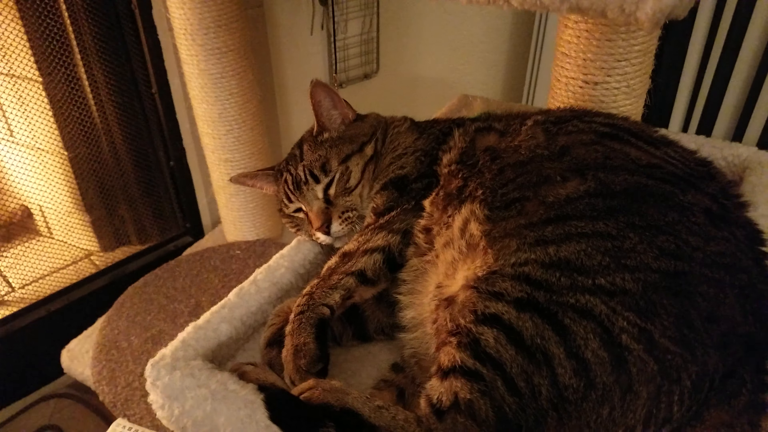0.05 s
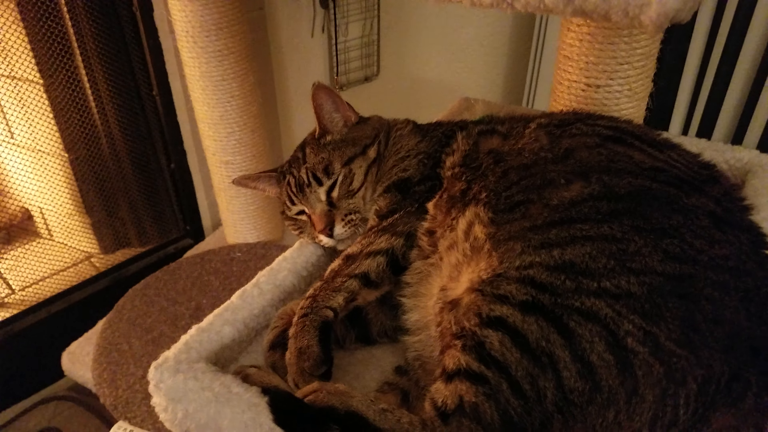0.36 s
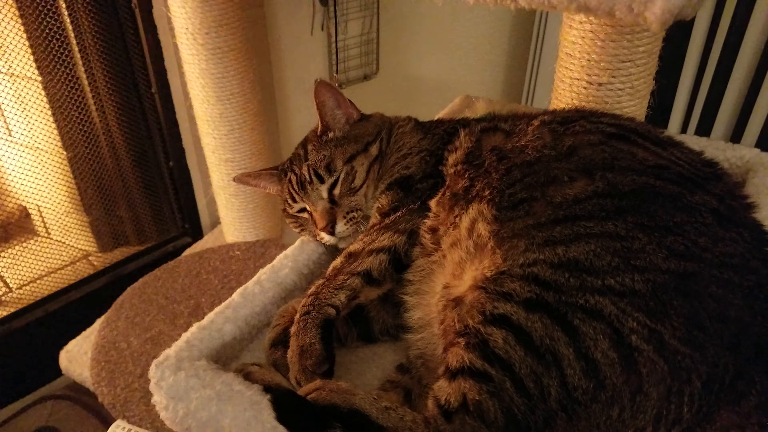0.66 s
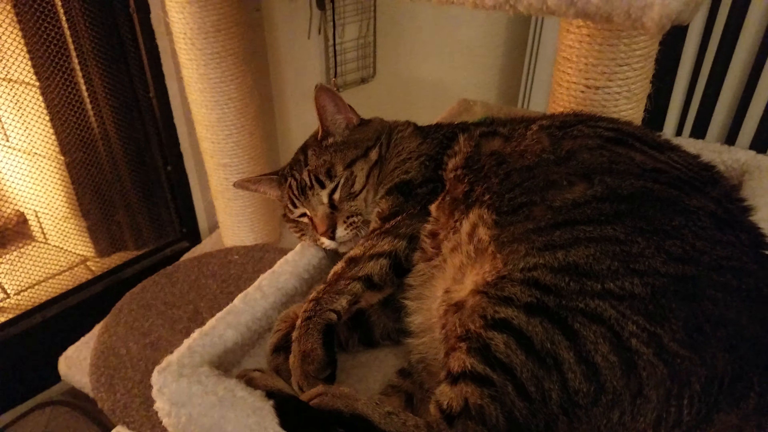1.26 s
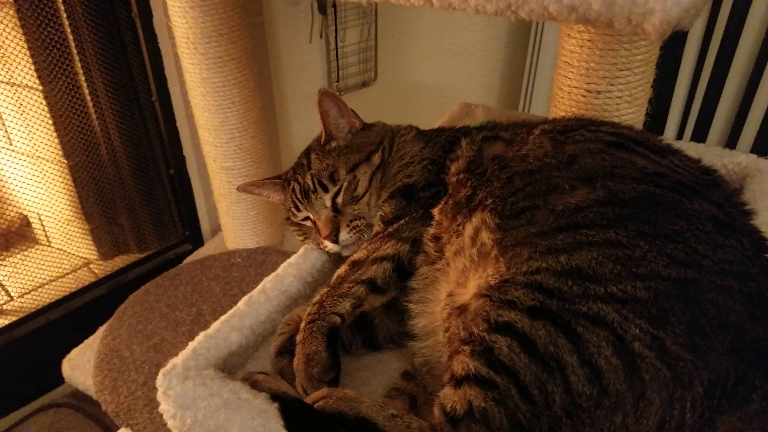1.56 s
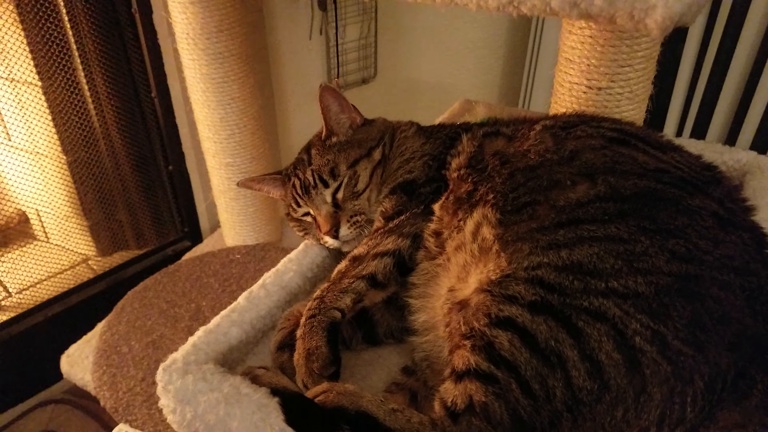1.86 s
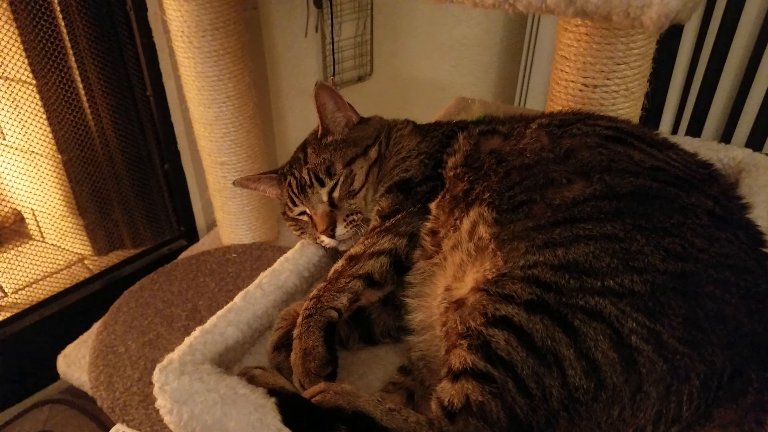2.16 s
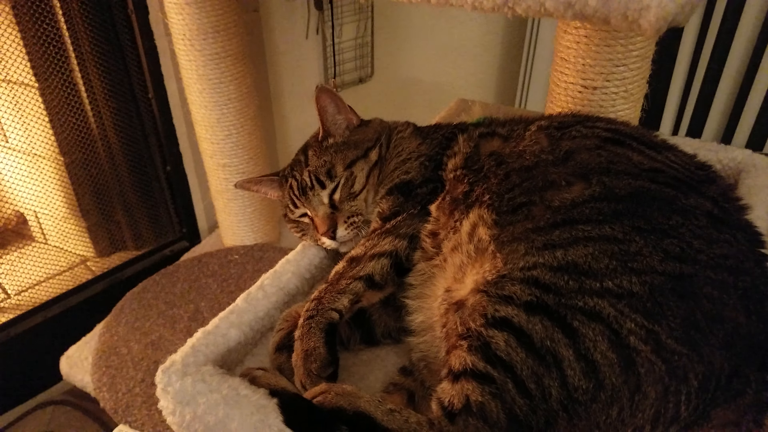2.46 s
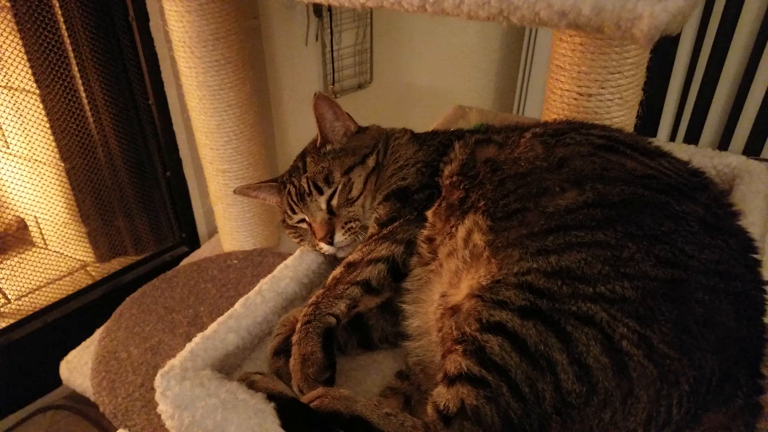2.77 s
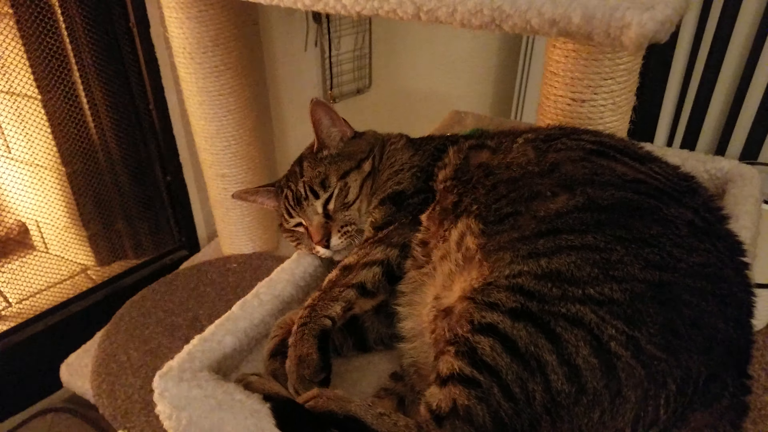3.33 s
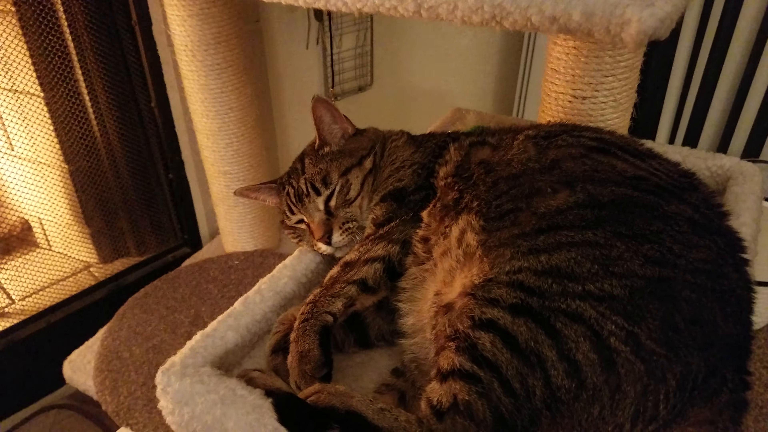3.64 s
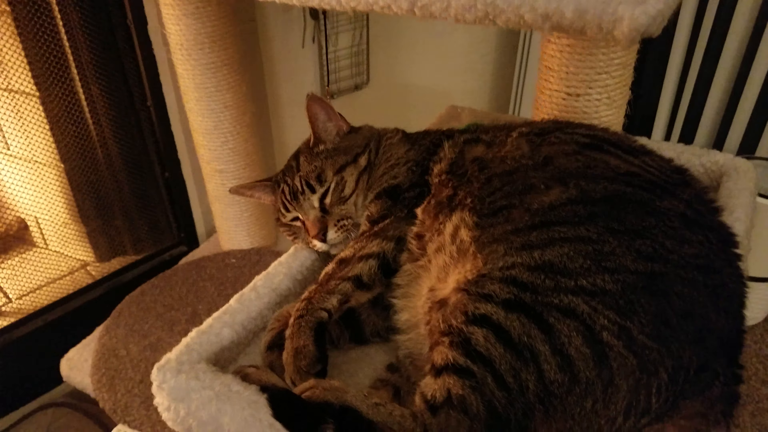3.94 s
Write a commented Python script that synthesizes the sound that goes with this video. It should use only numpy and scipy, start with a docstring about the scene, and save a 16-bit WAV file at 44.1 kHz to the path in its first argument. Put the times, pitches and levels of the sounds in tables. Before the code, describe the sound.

A gas fire burning with a low, soft rumble and small scattered pops.

```python
"""Gas fire in a quiet room

The fire burns behind its screen, a little to the left of a stereo microphone. A dense stream of tiny
puffs booms in the firebox and the room; now and then a flame pops or ticks, and twice the hot metal
clinks. A blower hums faintly underneath, and the microphone adds a thin hiss."""
import sys
import numpy as np
from scipy import signal
from scipy.fft import rfft, irfft
from scipy.io import wavfile

SR = 44100
rng = np.random.default_rng(int(sys.argv[2]) if len(sys.argv) > 2 else 0)


def store_wav(level_fs):
    """Save 16-bit WAV to argv[1]."""
    pcm = np.round(np.clip(np.atleast_2d(level_fs), -1, 1) * 32767)
    wavfile.write(sys.argv[1], SR, pcm.T.astype(np.int16))


N = 176400
T = np.arange(N) / SR
FFT_SIZE = 196608
HZ = np.maximum(np.arange(FFT_SIZE // 2 + 1) * SR / FFT_SIZE, 1)
SIDES = np.array([[1], [-1]])  # left, right
RIGHT_LAG_S = 0.00041


def undb(db):
    """Decibels to gain."""
    return 10 ** (np.asarray(db) / 20)


def level(x, db):
    """Scale to an rms level."""
    return x * undb(db) / np.sqrt(np.mean(x ** 2))


def over_hz(points):
    """Join (f/Hz, value) points on a log-frequency axis."""
    hz, value = np.array(points).T
    return np.interp(np.log(HZ), np.log(hz), value)


def shape(x, response):
    """Filter by a frequency response."""
    return irfft(rfft(x, FFT_SIZE) * response)[..., :N]


def causal(db):
    """The response with this dB curve that rings only after the blow (minimum phase)."""
    cepstrum = irfft(np.log(undb(db)))
    cepstrum[1:FFT_SIZE // 2] *= 2
    cepstrum[FFT_SIZE // 2 + 1:] = 0
    return np.exp(rfft(cepstrum))


def split(hz):
    """Low-pass and high-pass responses that cross at hz."""
    s = 1j * HZ / hz
    low = 1 / (s * s + np.sqrt(2) * s + 1)
    return low, low * s * s


def drift(per_s):
    """A random wander with a spread near 1."""
    return np.interp(T * per_s, np.arange(256), rng.standard_normal(256))


def firebox():
    """The ring of one puff in firebox and room, as a low and a high band."""
    # spectrum of a puff (f/Hz, level/dB)
    puff_colour = [(10, -46.5), (25, -9.5), (40, -6), (60, -1.5), (120, -7), (220, -10), (340, -9),
                   (500, -18), (640, -15.5), (1000, -13.5), (1250, -16.5), (1600, -17.5), (1950, -23.5),
                   (2400, -27.5), (2900, -33), (4400, -38), (6000, -47.5), (10000, -48), (20000, -83)]
    # resonances of firebox and room (f/Hz, width/Hz, lift/dB)
    resonances = [(51, 15, 3), (104.3, 14.8, 9.5), (143.6, 13, 6), (188.4, 16.6, 8.5), (254.4, 15.8, 6.5),
                  (286, 20, 0.5), (328, 6.9, 1), (371, 7.9, -0.5), (418, 33.5, 5.5), (602, 46, 4.5),
                  (745, 24, 7.5), (787.4, 37.4, 9.5), (928, 49, 4), (1694, 80, 1.5), (2128, 160, 6),
                  (2200, 82, -0.5), (2350, 100, 6), (4400, 260, 2)]
    lift_db = sum(db / (1 + (2 * (HZ - hz) / width) ** 2) for hz, width, db in resonances)
    ring = causal(over_hz(puff_colour) + lift_db)
    return [ring * band for band in split(hz=556)]


def room():
    """Two paths from fire to microphone: direct, arriving later on the right, and off the walls."""
    # power that comes by way of the walls (f/Hz, share/0-1)
    wall_share = [(50, 0), (150, 0.05), (300, 0.04), (450, 0.1), (620, 0.5), (790, 0.12), (1000, 0.47),
                  (1400, 0.22), (1900, 0.62), (2300, 0.22), (3000, 0.86), (8000, 0.65)]
    # stereo balance at the microphone (f/Hz, left minus right/dB)
    left_bias = [(50, 1), (200, -1.2), (400, 3), (550, -3), (850, 3.5), (1200, -0.5), (2300, 1.5),
                 (4000, 3.5)]
    share = over_hz(wall_share)
    balance = undb(SIDES * over_hz(left_bias) / 2)
    lag = np.exp(1j * np.pi * HZ * RIGHT_LAG_S * SIDES)
    return np.sqrt(1 - share) * lag * balance, np.sqrt(share) * balance


def puffs(spread_db, per_s=1500):
    """A random stream of pressure puffs of either sign, many small and a few large."""
    chance, size, sign = rng.random((3, N))
    hit, out = chance < per_s / SR, np.zeros(N)
    size_db = spread_db * np.minimum(-np.log(1 - size[hit]), 5)
    out[hit] = undb(size_db) * np.sign(sign[hit] - .5)
    return out


def flames(low, high, direct, walls):
    """Deep flutter, rumble and a lighter rush; the walls scatter each differently to the two sides."""
    # swell of the deep flutter (t/s, relative level/dB)
    flutter_swell = [(0.0, -60), (0.04, -50.5), (0.59, -54), (0.65, -57), (0.67, -52.5), (1.2, -55),
                     (1.75, -51), (1.78, -47.5), (2.15, -52.5), (2.26, -57), (2.31, -60), (2.35, -45.5),
                     (2.44, -68), (2.458, -51.5), (2.97, -60), (3.0, -52), (3.2, -52), (3.23, -49.5),
                     (4.0, -53.5)]
    # swell of the rumble above it (t/s, relative level/dB)
    rumble_swell = [(0.0, -56.5), (0.03, -52.5), (0.32, -54.5), (0.33, -49), (0.44, -54.5), (1.25, -52),
                    (1.56, -56), (1.57, -53.5), (2.13, -54), (2.19, -52.5), (2.23, -55.5), (2.26, -57),
                    (2.28, -52.5), (2.41, -52.5), (2.47, -54.5), (2.57, -53), (2.61, -56.5), (2.65, -53),
                    (3.77, -55), (4.0, -52)]

    def stream(band, swell, spread_db, rms_db, follow=1):
        """Puffs through one band of the firebox's ring, rising and falling with a swell."""
        when, swell_db = np.array(swell).T
        source = puffs(spread_db)
        scattered = source.std() * rng.standard_normal((2, N))
        sound = shape(source, band * direct) + shape(scattered, band * walls)
        return level(sound * undb(follow * np.interp(T, when, swell_db)), rms_db)
    deep, upper = split(hz=129)
    flutter = stream(low * deep, flutter_swell, spread_db=3.5, rms_db=-53.5)
    rumble = stream(low * upper, rumble_swell, spread_db=3.5, rms_db=-53.5)
    rush = stream(high, rumble_swell, spread_db=2.5, rms_db=-58.5, follow=0.33)
    return flutter + rumble + rush


def blower():
    """The fan hums faintly under the fire, its tones wavering slightly in pitch and level."""
    # fan tones at the microphone (f/Hz, left level/dB, right level/dB)
    tones = [(53.4, -65, -61), (105.44, -62.5, -64.5), (190.1, -66, -69), (1115, -75.5, -87.5),
             (1156, -77, -75.5)]
    out = np.zeros((2, N))
    fan_time = np.cumsum(1 + 0.0005 * drift(per_s=5.86)) / SR
    for hz, left_db, right_db in tones:
        phase = 2 * np.pi * (hz * (fan_time + SIDES * RIGHT_LAG_S / 2) + rng.random())
        waver = undb(2.9 * drift(per_s=9.2))
        out += np.sqrt(2) * undb([[left_db], [right_db]]) * np.sin(phase) * waver
    return out


def pops(low, high, direct, walls):
    """A pocket of flame collapses: a dip in pressure thumps the box, under a dull or bright sputter."""
    # flame pops (t/s, relative thump level/dB, relative sputter level/dB, sputter tilt/dB per octave)
    collapses = [(0.0369, 1.5, -2.5, 1), (0.073, -2, -10, -3), (.101, -13, -8.5, 2), (.147, -3.5, -17, 2),
                 (0.161, -3.5, -7, 1.5), (0.247, -12, -12, 3), (.337, 1.5, -9, 4), (0.957, -4.5, -9.5, 0.5),
                 (1.035, -1, -3, 0.5), (1.093, -6, -9, 0), (1.423, -8, -5, -1), (1.603, -3.5, -18, 5),
                 (1.787, -10, -10, 4), (1.81, -1.5, -14, 1), (1.837, -5, -11, 4.5), (1.9845, -1.5, -8, 1.5),
                 (2.185, -2, -1, 0), (2.226, -15, -6, -2), (2.2512, -1, -9, 2), (2.2603, -1.5, -9, -3),
                 (2.266, -4.5, -14, -5), (2.481, -0.5, -15, 3), (2.525, 0.5, -17, 2), (2.563, -2, -17, 4),
                 (2.723, -8, -22, 0), (2.821, -3, -10, 1), (3.054, -2.5, -4.5, -7), (3.120, -5, -10, 2),
                 (3.379, -25, -11, 3), (3.422, 1.5, -3, -2), (3.492, -14, -5, 1.5), (3.541, -3, -8.5, 2),
                 (3.7044, -3, -1.5, 1), (3.710, -15, -13, -1.5), (3.804, -7, -4.5, -3.5),
                 (3.935, -10, -5, 0)]
    # colour of a sputter against that of a puff (f/Hz, level/dB)
    sputter_colour = [(700, -1), (1350, 1.5), (1700, -4.5), (2200, -2), (2900, -1), (3600, 1), (4500, -3.5)]
    rise_s, decay_s, room_t60_s = 0.00096, 0.0032, 0.067
    thumps, sputters = np.zeros((2, N))
    age = T[:2048]
    fade = (1 - np.exp(-age / rise_s)) * np.exp(-age / decay_s)
    fade /= np.linalg.norm(fade)
    octaves = np.log2(np.clip(np.fft.rfftfreq(len(age), 1 / SR), 500, 5000) / 1200)
    for start, thump_db, sputter_db, tilt_db in collapses:
        i = int(start * SR)
        thumps[i] -= undb(thump_db)
        noise = irfft(rfft(rng.standard_normal(len(age))) * undb(tilt_db * octaves))
        sputters[i:i + len(age)] += (undb(sputter_db) * noise * fade)[:N - i]
    tail = rng.standard_normal((2, N)) * np.exp(-np.log(1000) * T / room_t60_s)
    echo = walls * rfft(tail / np.linalg.norm(tail, axis=1, keepdims=True), FFT_SIZE)
    thump_band = split(hz=44.3)[1] * split(hz=596)[0]
    thump_ring = low * undb(-17.5) / np.abs(low).std() * thump_band
    sputter_ring = high * undb(-21) / np.sqrt(np.mean(np.abs(high) ** 2))
    sputter_ring *= causal(over_hz(sputter_colour))
    return (shape(thumps, thump_ring * (direct + 0.96 * echo))
            + shape(sputters, sputter_ring * (direct + echo)))


def ticks():
    """Tiny dry snaps, most of them riding on a pop, each brightest around its own pitch."""
    # snaps (t/s, level before filtering/dB, centre f/Hz)
    snaps = [(0.3367, -34.5, 2600), (1.038, -36, 2000), (2.185, -43, 5800), (2.822, -45, 5000),
             (2.886, -44, 4470), (3.38, -45, 5000), (3.492, -47, 4500), (3.709, -47, 3500)]
    decay_s, half_width_octaves = 0.00072, 1.06
    out = np.zeros((2, N))
    for start, db, hz in snaps:
        i = int(start * SR)
        snap = rng.standard_normal((2, N - i)) * np.exp(-T[:N - i] / decay_s)
        band_db = -12 - 3 * (np.log2(HZ / hz) / half_width_octaves) ** 2
        colour = causal(np.maximum(band_db, -60))
        out[:, i:] += undb(db) * shape(snap, colour)[:, :N - i]
    return out


def clinks():
    """The hot sheet metal of the firebox rings briefly, reaching the left side first."""
    # clinks of the metal (t/s, level/dB)
    onsets = [(2.186, -60), (3.710, -52.5)]
    # its modes (f/Hz, relative level/dB, t60/s)
    modes = [(777, 3.5, 0.11), (930, 1, 0.098), (1510, -19, 0.25), (2310, -6.5, 0.072)]
    out = np.zeros((2, N))
    age = np.maximum(T[:8192] - np.array([[0], [RIGHT_LAG_S]]), 0)
    for start, db in onsets:
        i = int(start * SR)
        for hz, mode_db, t60 in modes:
            ring = np.sin(2 * np.pi * hz * age) * np.exp(-np.log(1000) * age / t60)
            out[:, i:i + age.shape[1]] += undb(db + mode_db) * ring
    return out


def scene():
    """Fire and blower as they reach the microphone through the room."""
    responses = (*firebox(), *room())
    return flames(*responses) + blower() + pops(*responses) + ticks() + clinks()


def record(dry):
    """The microphone adds its flickering hiss, 2 dB louder on the left; the top is cut steeply."""
    # microphone self-noise (f/Hz, relative level/dB)
    hiss_colour = [(100, 4), (3000, -1.5), (5000, -6.5), (7000, -10), (9000, -12.5), (11000, -9),
                   (13000, -4.5), (15500, -1)]
    flicker_db, top_hz = 1.2, 15760
    hiss = level(shape(rng.standard_normal((2, N)), undb(over_hz(hiss_colour))), db=-67.5)
    hiss *= undb(SIDES + flicker_db * drift(per_s=30.06))
    top_cut = signal.ellip(14, .1, 70, top_hz, fs=SR, output="sos")
    return signal.sosfilt(top_cut, dry + hiss)


dry = scene()
out = record(dry)
store_wav(out)
```